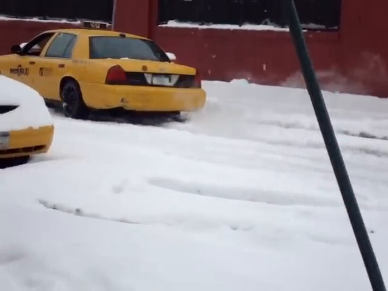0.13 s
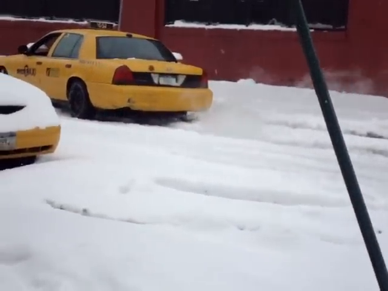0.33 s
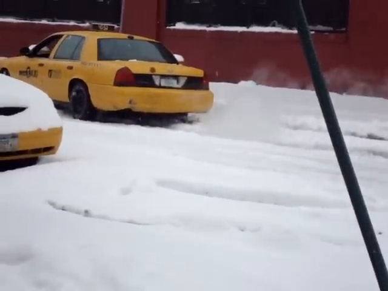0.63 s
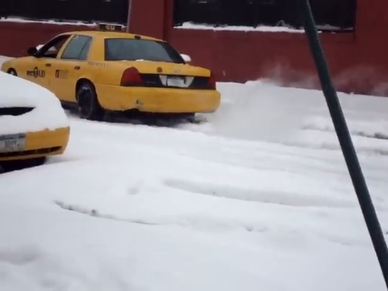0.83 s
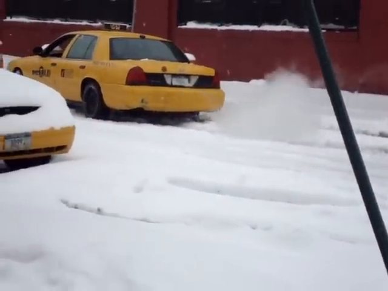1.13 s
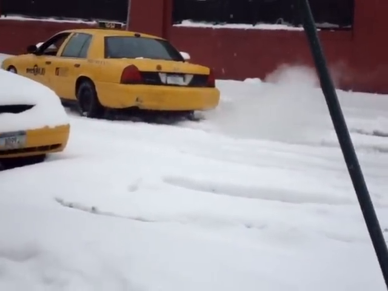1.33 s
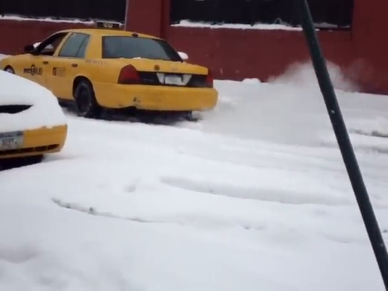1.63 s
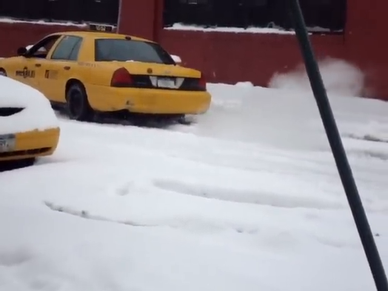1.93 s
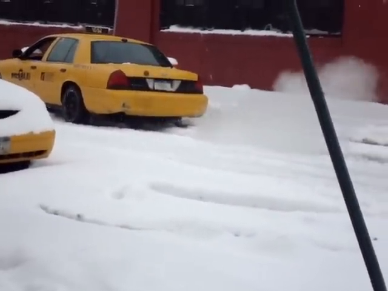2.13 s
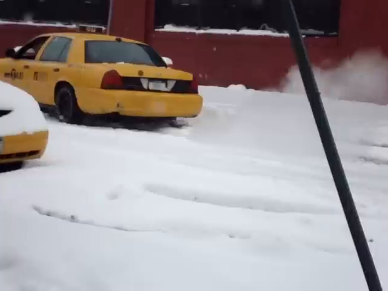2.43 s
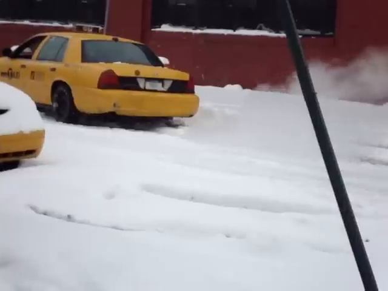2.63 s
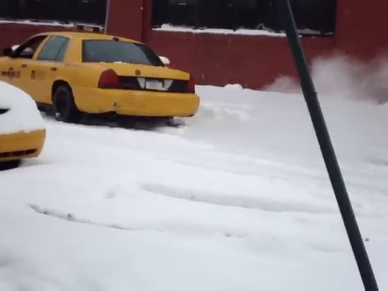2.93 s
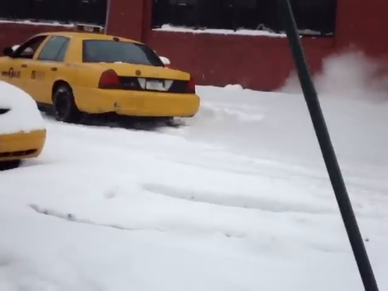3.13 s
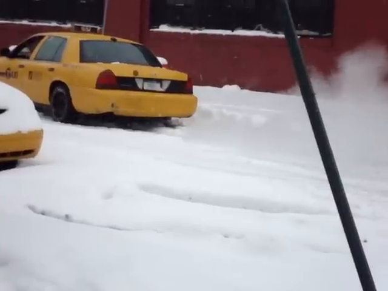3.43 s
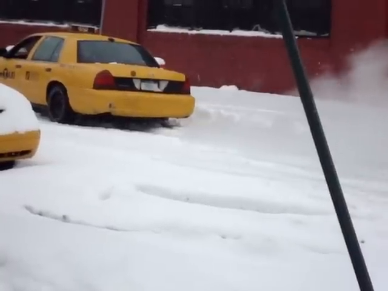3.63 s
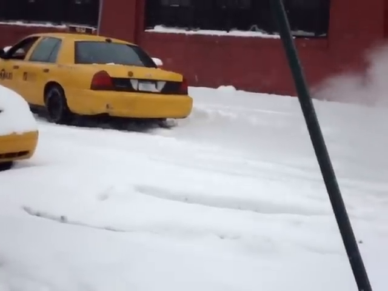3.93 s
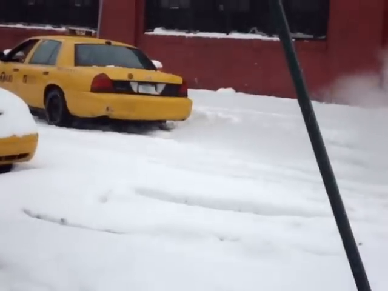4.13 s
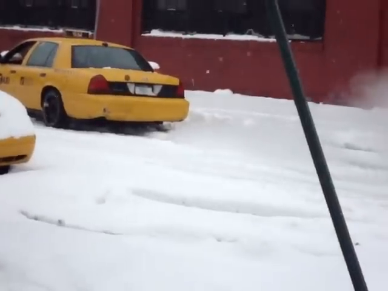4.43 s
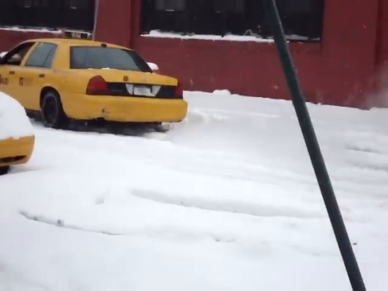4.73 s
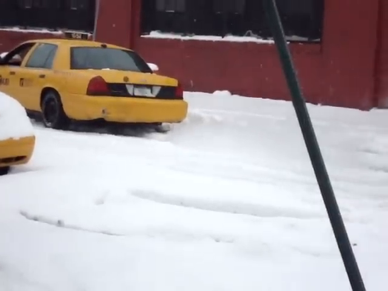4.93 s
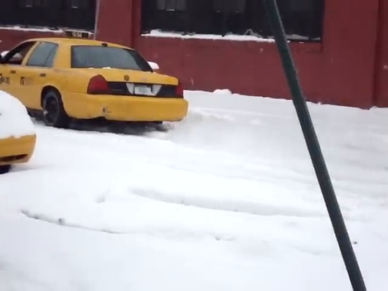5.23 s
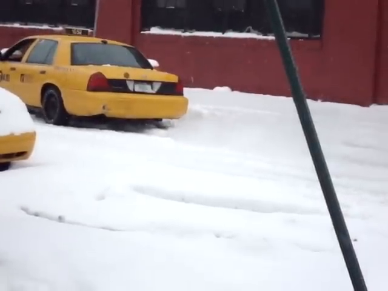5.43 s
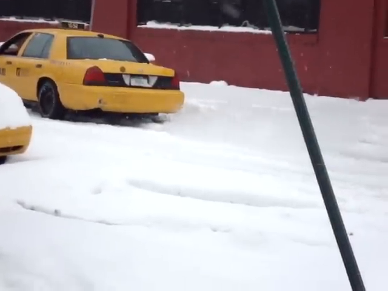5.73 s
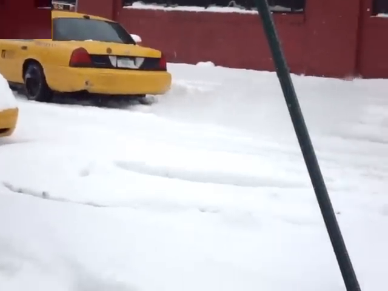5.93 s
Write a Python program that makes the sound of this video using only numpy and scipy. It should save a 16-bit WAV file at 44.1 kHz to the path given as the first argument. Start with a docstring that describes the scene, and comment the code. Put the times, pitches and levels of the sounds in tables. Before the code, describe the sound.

Across a snowy street, a stuck car spins its tyres. A breathy, rubbery whine starts faint, surges up, sags, climbs higher, dips, then swells to its loudest before dying back and starting again. Throttle hiss and snow spray ride the surges, with faint gliding exhaust notes beneath and tiny high chirps late on. Soft distant traffic hums behind. One outdoor microphone, some way off, slightly dull, with close echoes but no long reverberation.

```python
"""Across a snowy street, some way from the microphone, a stuck car spins its rear wheels in bursts of throttle.
City noise and wavering hums lie behind; faint exhaust notes rise and fall as gliding tones.
The open throttle and thrown snow hiss as coloured noise; chirps and a squeak are narrow noise bands.
Nearest the ear, the tread whines in two bands that follow the wheel speed, over rubber scrubbing on snow."""
import sys
import numpy as np
from scipy import signal
from scipy.fft import rfft, irfft, next_fast_len
from scipy.io import wavfile
from scipy.ndimage import uniform_filter1d, map_coordinates

SR = 44100
rng = np.random.default_rng(int(sys.argv[2]) if len(sys.argv) > 2 else 0)


def output_pcm(signal):
    """Save a mono or channel-first signal as 16-bit PCM at the path in sys.argv[1].

    Samples are clipped to [-1, 1] before scaling.
    """
    pcm = np.clip(np.atleast_2d(signal).T, -1, 1) * 32767
    wavfile.write(sys.argv[1], SR, np.round(pcm).astype(np.int16))


N = 267775

# the spinning tyre: time_s, tread_blocks_per_second_hz, upper_band_multiple_of_that,
# bite_db (level of the whine before grip and wheel arch)
WHEEL_SPIN = [(0, 516, 1.75, -47), (.14, 569, 1.75, -50), (.42, 763, 1.75, -45.5),
              (.58, 914.6, 1.75, -34.5), (.82, 1059, 1.75, -31.5), (1.1, 846, 1.7, -37),
              (1.3, 705.4, 1.75, -40.5), (1.42, 663.3, 1.75, -40), (1.54, 800, 1.62, -33.5),
              (1.72, 870, 1.75, -32.5), (1.9, 991, 1.8, -31.5), (2.1, 1069, 1.85, -28.5),
              (2.2, 1230, 1.72, -29), (2.37, 1260, 1.7, -29), (2.47, 1075, 1.75, -30),
              (2.8, 958.6, 1.73, -30.5), (3.2, 802, 1.75, -32.5), (3.45, 748.8, 1.9, -35),
              (3.7, 792, 1.8, -33), (4.0, 931.3, 1.75, -27), (4.3, 1087, 1.7, -25.5), (4.6, 1123, 1.6, -23),
              (4.9, 1058, 1.55, -22.5), (5.12, 846, 1.7, -25), (5.24, 710, 1.85, -26),
              (5.31, 900, 1.65, -31), (5.5, 880, 1.7, -37), (5.76, 800, 1.75, -44),
              (5.87, 800, 1.75, -41.5), (6.07, 1077, 1.75, -31)]
# engine notes, one list per stretch that is heard: time_s, pitch_hz, level_db
ENGINE_NOTES = [
    [(.05, 58, -62), (.15, 73, -55), (.25, 90, -60), (.4, 118, -58), (.6, 150, -59), (.8, 172, -59)],
    [(1.3, 118, -60), (1.55, 150, -53), (1.75, 178, -50), (1.9, 195, -52), (2.05, 215, -45),
     (2.25, 238, -48), (2.4, 248, -57)],
    [(3.03, 84, -63), (3.25, 79, -57), (3.4, 75, -62), (3.6, 69, -66), (3.8, 64, -68)],
    [(3.72, 171, -52), (3.87, 168, -48), (4.0, 165, -58), (4.3, 159, -56), (4.6, 153, -58),
     (4.85, 147, -59)],
    [(5.78, 65, -62), (5.9, 77, -54), (6.0, 95, -57), (6.12, 112, -56)],
]
USUAL_BITE_DB = -33  # a middling bite, from which the growing layers count


def amp(db):
    """Decibels to gain."""
    return 10 ** (np.asarray(db) / 20)


def unit(x):
    """Scaled to rms 1."""
    return x / np.sqrt(np.mean(np.abs(x) ** 2) + 1e-20)


def along(points, at):
    """(position, value) points read on a log axis."""
    position, value = np.transpose(points)
    return np.interp(np.log(at + 1e-6), np.log(position), value)


def curves(rows):
    """One value per sample for each column after the time."""
    time_s, *columns = np.transpose(rows)
    return [np.interp(np.arange(N) / SR, time_s, column) for column in columns]


def wobble(rate):
    """A smooth random curve, rate knots a second."""
    return map_coordinates(rng.standard_normal(N // 100), [np.arange(N) * rate / SR])


def filtered(x, response):
    """Sound x shaped by a response of frequency."""
    size = next_fast_len(N + 8192)
    spectrum = rfft(x, size) * response(np.fft.rfftfreq(size, 1 / SR))
    return irfft(spectrum, size)[:N]


def rush(spectrum, patchy_db):
    """Coloured noise of rms 1 with patches of random gain in time and pitch."""
    grains = signal.stft(rng.standard_normal(N + 512), nperseg=512)[2]
    patches = uniform_filter1d(rng.standard_normal(grains.shape), size=6, axis=0)
    patches = uniform_filter1d(patches, size=8, axis=1)
    noise = signal.istft(grains * amp(patchy_db * unit(patches)), nperseg=512)[1][:N]
    return unit(filtered(noise, lambda hz: amp(along(spectrum, hz))))


def narrow(centre_hz, width_hz):
    """Noise of rms 1 in one narrow bell-shaped band."""
    def bell(hz):
        return np.exp(-.5 * ((hz - centre_hz) / (width_hz / 2)) ** 2)
    return unit(filtered(rng.standard_normal(N), bell))


def throttle():
    """Gain of the intake hiss: it builds while the pedal is down and drops when it lifts."""
    # presses of the pedal: opens_s, shuts_s, hiss_db as it shuts (before flutter and throb)
    presses = [(0.032, 0.704, -37.5), (1.37, 2.24, -30), (2.301, 2.82, -37.5), (5.8, 6.05, -42.5)]
    opening_bend, shut_db_per_s = 0.85, 85
    t = np.arange(N) / SR
    gain = np.zeros(N)
    for opens, shuts, db in presses:
        progress = np.clip((t - opens) / (shuts - opens), 0, 1)
        drop_db = shut_db_per_s * np.maximum(t - shuts, 0)
        gain += progress ** opening_bend * amp(db - drop_db)
    return gain


def driven(level_db, grows, throttle_db, lag_s=0):
    """Gain of a layer fed by the tread's bite, which may lag, and by the throttle; their powers add."""
    # grows: dB per dB of bite; throttle_db: share of a press, relative to its hiss
    at = np.arange(N)
    bite_db = np.interp(at - lag_s * SR, at, curves(WHEEL_SPIN)[-1]) - USUAL_BITE_DB
    return np.hypot(amp(level_db + grows * bite_db), amp(throttle_db) * throttle())


def firing(rows):
    """Fade, phase in radians and level in dB of one stretch of engine note."""
    t = np.arange(N) / SR
    hz, db = curves(rows)
    heard = np.clip(np.minimum(t - rows[0][0], rows[-1][0] - t) / .05, 0, 1)
    return heard, 2 * np.pi * np.cumsum(hz) / SR, db


def street():
    """Distant traffic noise, a little of the car's noise returned by the street, and narrow hums."""
    # traffic and idling engines: frequency_hz, relative_level_db_per_hz
    traffic = [(13, -67.5), (22, -27), (87, -17), (145, -12.5), (183, -7), (280, -3.5), (312, -7), (602, 0),
               (760, -3), (882, 0.5), (960, -5), (1290, -9), (2890, -16.5), (3500, -21.5), (4550, -59),
               (7700, -120)]
    # wavering hums: centre_hz, width_hz, level_db
    street_hums = [(84, 8.8, -67), (173.3, 4.1, -58), (295.8, 4.4, -54.5), (320.7, 8.8, -56)]
    hums = sum(amp(db) * narrow(hz, width_hz) for hz, width_hz, db in street_hums)
    gain = driven(level_db=-37, grows=0.033, throttle_db=-4.5)
    return gain * rush(traffic, patchy_db=0.25) + hums


def squeals():
    """Short whistling chirps, then a squeak as the wheel slows, all narrow bands of noise."""
    # faint flickering squeak: time_s, level_db before the flicker
    squeak_levels = [(4.8, -59), (5.25, -52.5), (5.7, -54.5), (5.85, -64)]
    # thin high chirps, about one per turn of the wheel: start_s, pitch_hz, level_db
    chirp_list = [(4.027, 6706, -43), (4.15, 7400, -50), (4.24, 7905, -47), (4.37, 8020, -48),
                  (4.455, 8090, -43.5), (4.565, 7920, -43), (4.774, 7916, -46), (4.865, 7680, -46)]
    chirp_s, chirp_width_hz = 0.049, 180
    t = np.arange(N) / SR
    heard = (t > squeak_levels[0][0]) & (t < squeak_levels[-1][0])
    flicker_db = 2.5 * wobble(20)
    out = heard * amp(curves(squeak_levels)[0] + flicker_db) * narrow(2910, width_hz=110)
    for start_s, hz, db in chirp_list:
        swell = np.sin(np.pi * np.clip((t - start_s) / chirp_s, 0, 1)) ** 0.72
        out += amp(db) * np.abs(swell) * narrow(hz, chirp_width_hz)
    return out


def exhaust():
    """Firing tones, slightly unsteady in level and phase, that fade in and out."""
    out = np.zeros(N)
    for heard, phase, db in map(firing, ENGINE_NOTES):
        tone = np.sqrt(2) * np.sin(phase + .3 * wobble(10))
        out += heard * amp(db + 2 * wobble(12)) * tone
    return out


def intake(flutter_db):
    """Hiss of air through the open throttle, throbbing once per crank turn in the first two stretches."""
    # colour of the intake: frequency_hz, relative_level_db_per_hz
    intake_colour = [(1350, -22), (2300, -0.5), (2520, -10.5), (2720, -1.5), (3160, -9), (3520, -7),
                     (4360, -3.5), (5030, -4.5), (6650, -11.5), (7400, -20), (9620, -39.5), (16300, -120)]
    throb = sum(heard * np.sin(phase / 4) for heard, phase, db in map(firing, ENGINE_NOTES[:2]))
    return throttle() * amp(flutter_db + 1.5 * throb) * rush(intake_colour, patchy_db=0.9)


def wheel_hiss(flutter_db):
    """Mid hiss of snow off the spinning wheel, growing with the tread's bite."""
    # colour of the hissing snow: frequency_hz, relative_level_db_per_hz
    hiss_colour = [(1350, -27), (2300, -2.5), (2720, -4.5), (3160, -7), (3520, -7.5), (4360, -7.5),
                   (5030, -7), (6650, -11), (7400, -18.5), (9620, -38), (16300, -120)]
    level_db, grows = -42, 0.59  # at the usual bite; dB per dB of bite
    bite_db = curves(WHEEL_SPIN)[-1] - USUAL_BITE_DB
    return amp(level_db + grows * bite_db + flutter_db) * rush(hiss_colour, patchy_db=0.74)


def thrown_snow(flutter_db):
    """High spray of thrown snow; the part fed by bite is heard late, as it comes down."""
    # colour of the spray: frequency_hz, relative_level_db_per_hz
    spray_colour = [(4060, -57.5), (6900, -7), (7280, -6), (7770, 1), (8140, 0.5), (9880, -5.5),
                    (12800, -32), (21700, -120)]
    gain = driven(level_db=-55, grows=0.56, throttle_db=-18.5, lag_s=0.066)
    return gain * amp(flutter_db + 0.7 * wobble(50)) * rush(spray_colour, patchy_db=1.0)


def air():
    """Intake, wheel hiss and thrown snow sharing one flutter of level."""
    flutter_db = 0.73 * wobble(110)
    return intake(flutter_db) + wheel_hiss(flutter_db) + thrown_snow(flutter_db)


def surroundings(hz):
    """Response of the wheel arch and its hollows, with the comb that near echoes add."""
    # wheel arch and snow rut colour the whine: frequency_hz, gain_db
    arch_colour = [(400, -23), (700, -3.5), (1000, -2.5), (1400, 0), (1700, -1), (2150, 1.5), (2300, -22),
                   (3200, -17)]
    # hollows of the arch that lift or swallow a narrow band: centre_hz, width_hz, gain_db
    arch_hollows = [(885, 60, 1.5), (1058, 40, 4), (1145, 30, 2), (1170, 25, -2), (1250, 40, 2),
                    (1315, 30, -2.5), (1355, 50, 2), (1500, 70, 1), (1685, 35, -3), (1740, 70, 3),
                    (2000, 50, 1.5), (2130, 70, 1.5)]
    # the wall and parked cars answer: delay_s, level_db
    near_echoes = [(.021, -16.5), (0.0072, -25), (0.004, -28)]
    hollows_db = sum(db * np.exp(-.5 * ((hz - centre_hz) / (width_hz / 2)) ** 2)
                     for centre_hz, width_hz, db in arch_hollows)
    comb = 1 + sum(amp(db) * np.exp(-2j * np.pi * hz * delay_s) for delay_s, db in near_echoes)
    return amp(along(arch_colour, hz) + hollows_db) * comb


def tread(band, block_hz, firm, wander):
    """Blocks striking in step give a wandering tone; a rough profile laid along the tread smears the rest."""
    # firm: share of power in the tone; wander: phase swing in radians
    steps, size = 24, 2 ** 18  # profile points per block, points in all
    blocks = np.cumsum(block_hz) / SR
    multiple = np.fft.rfftfreq(size, 1 / steps)
    profile = unit(irfft(rfft(rng.standard_normal(size)) * amp(along(band, multiple))))
    smear = map_coordinates(profile, [blocks * steps], mode="wrap")
    tone = np.sqrt(2) * np.sin(2 * np.pi * blocks + wander * wobble(130))
    return np.sqrt(firm) * tone + np.sqrt(1 - firm) * smear


def tyre():
    """Tread whine in two bands that glide with speed, over a scrub whose pitch does not."""
    # uneven block lengths smear each band: multiple_of_band_centre, relative_level_db
    lower_smear = [(.6, -31), (.8, -9.5), (.92, -6), (1.0, -10), (1.08, -6.5), (1.25, -10.5), (1.5, -32)]
    upper_smear = [(.7, -34.5), (.84, -3), (.93, -3.5), (1.0, -8), (1.08, -7.5), (1.2, -6), (1.5, -37)]
    # upper band over the whine: time_s, level_db
    upper_balance = [(0, -2), (.42, 0.5), (.82, -9), (1.05, -0.5), (1.65, -3.5), (2.1, -11), (2.5, -8),
                     (2.9, -5.5), (3.25, 0), (3.75, 0), (4.05, -4), (4.35, -10.5), (4.75, -9), (5.05, -4),
                     (5.3, -4.5), (5.85, -9.5), (6.07, -15)]
    # rubber sliding on snow: frequency_hz, relative_level_db_per_hz
    scrub_colour = [(240, -55), (400, -44), (487, -47), (655, -3.5), (1050, -5.5), (1620, -8), (1770, -10),
                    (2380, -15), (3400, -10), (4420, -42), (7480, -120)]
    block_hz, ratio, whine_db = curves(WHEEL_SPIN)
    upper_db = whine_db + curves(upper_balance)[0]
    rubber = tread(lower_smear, block_hz, firm=.55, wander=1.9) * amp(whine_db)
    rubber += tread(upper_smear, block_hz * ratio, firm=.55, wander=2.0) * amp(upper_db)
    scrub_gain = driven(level_db=-34, grows=0.79, throttle_db=-4)
    rubber += scrub_gain * rush(scrub_colour, patchy_db=0.8)
    # a throb per wheel turn of 100 blocks, and uneven bite
    turn = np.sin(2 * np.pi * np.cumsum(block_hz) / SR / 100 + wobble(3))
    grip = amp(0.37 * turn + 1.95 * wobble(150))
    return filtered(grip * rubber, surroundings)


def scene():
    """All sources, heard in the open over sound-soaking snow."""
    return (street() + squeals() + exhaust() + air() + tyre())[None]


def record(dry):
    """The microphone channel keeps nothing above its band limit."""
    top_hz, slope_hz = 10060, 60
    return filtered(dry[0], lambda hz: np.clip((top_hz - hz) / slope_hz, 0, 1))[None]


dry = scene()
out = record(dry)
output_pcm(out)
```